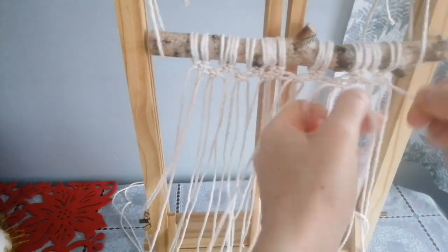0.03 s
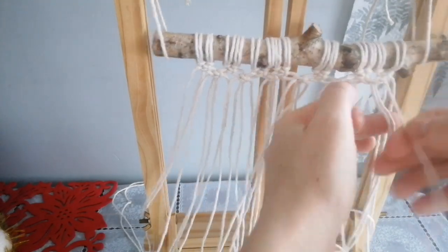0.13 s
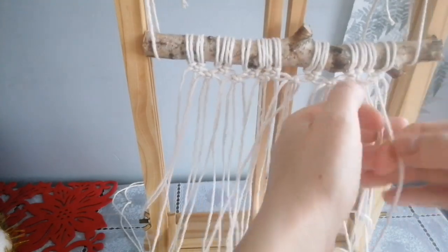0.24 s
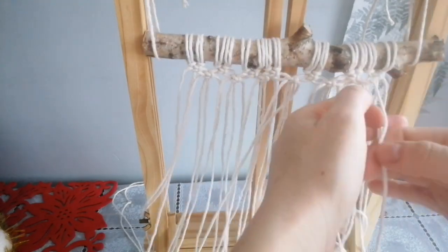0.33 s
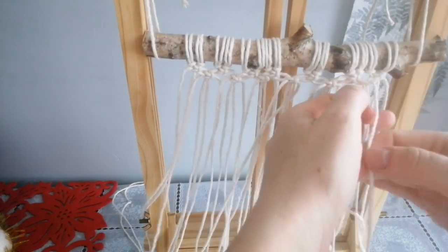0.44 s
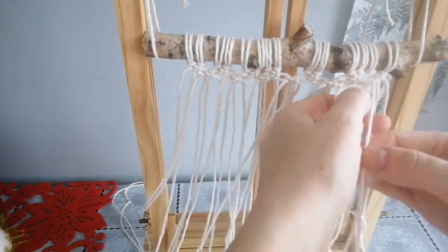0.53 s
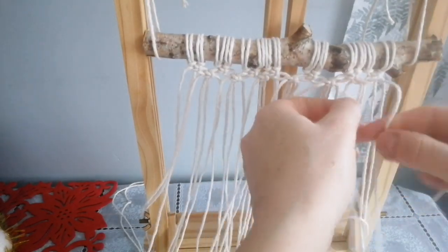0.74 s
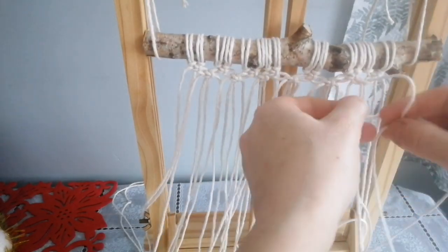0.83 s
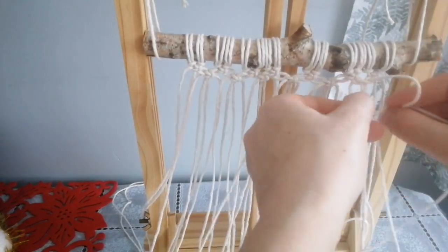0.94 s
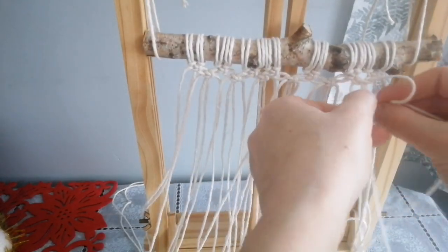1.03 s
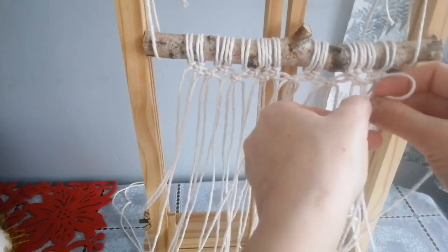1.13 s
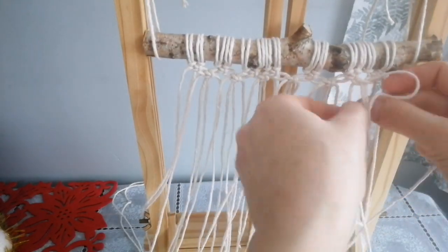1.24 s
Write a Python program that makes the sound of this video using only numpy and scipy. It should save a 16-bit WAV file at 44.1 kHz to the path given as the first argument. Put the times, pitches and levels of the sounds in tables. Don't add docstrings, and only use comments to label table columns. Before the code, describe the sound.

Cotton cords pulled through knots by hand, with clicky snaps and dull wooden frame thumps

```python
import sys
import numpy as np
from scipy import signal
from scipy.fft import rfft, irfft
from scipy.io import wavfile
from scipy.ndimage import uniform_filter1d

SR = 44100
rng = np.random.default_rng(int(sys.argv[2]) if len(sys.argv) > 2 else 0)


def boost_factor(decibels):
    exponent = np.asarray(decibels, float) / 20
    return 10 ** exponent


def master_out(mix):
    frames = np.transpose(np.atleast_2d(mix))
    ceiling = np.clip(frames, -1, 1)
    pcm = np.round(ceiling * 32767).astype(np.int16)
    wavfile.write(sys.argv[1], SR, pcm)


N = 57330

# start_s, length_s, level_db, brightness_db, peak_place (0-1 of the length)
STROKES = [(-.03, .12, -47, -9, 0), (0.045, 0.095, -73, 11.5, 0.45), (0.108, 0.58, -71.5, 2.5, 0.22),
           (0.2544, 0.039, -41.5, -6, 0), (0.4553, 0.025, -56.5, -5, 0.13), (0.53, 0.033, -57, 5, 0.2),
           (0.6136, 0.098, -52, 0.5, 0.03), (0.582, 0.046, -61.5, 2.5, 0.51),
           (.652, 0.037, -44, -1.5, 0.15), (0.657, 0.084, -46, 0.5, 0.06), (0.729, 0.094, -65, -1.5, 0.55),
           (0.856, 0.037, -62, -11, 0.26), (1.02, 0.11, -64.5, 3.5, 0.78), (1.118, 0.039, -55, 3, 0.18),
           (1.129, 0.082, -57, 3, 0.5), (1.288, 0.024, -62.5, -14, 0.36)]
# pitch_hz, level_db
CORD_TONE = [(650, -8.5), (850, 0.5), (1040, 4), (1350, -1.5), (1750, 4.5), (2900, -6.5), (3700, -18.5),
             (6000, -19.5)]
# pitch_hz, level_db
FIBRE_TONE = [(2500, 2.5), (4000, 0), (6500, 1.5), (8500, -4), (11000, -14.5)]
# pitch_hz, level_db
FUZZ_TONE = [(6000, -29), (9000, -10.5), (11000, -3.5), (13500, -11.5), (15800, -16)]
SLIPS_PER_S, SLIP_SPREAD_DB, CLUMP_DB = 7000, 2.6, 1.6
FUZZ_SLOPE = 1.82

# time_s, level_db
SQUEAK = [(.03, -106), (.07, -66), (.15, -71.5), (.24, -73), (.3, -79), (.48, -75.5), (.55, -100)]
SQUEAK_HZ, SQUEAK_WIDTH_HZ = 2585, 290

# start_s, level_db, pitch_hz, fade_s (to -60 dB), left_over_right_db
SNAPS = [(0.167, -63, 6100, 0.0021, 21), (.226, -59.5, 7100, .002, 3), (.256, -38, 6520, 0.0016, 21.5),
         (0.2581, -42.5, 1217, 0.055, 10.5), (0.2593, -39.5, 1605, 0.034, 2),
         (0.2593, -47.5, 2150, 0.099, 14), (.4555, -49.5, 1023, 0.024, 7), (.529, -43.5, 11600, 0.004, -19),
         (0.5292, -38, 1815, 0.0069, -8.5), (0.5315, -41, 5500, 0.00077, -11),
         (0.5282, -38, 4250, 0.005, -6.5), (0.5301, -44.5, 1063, 0.013, 7.5),
         (0.5303, -35, 2790, 0.0055, -5.5), (0.5362, -35, 1630, 0.0067, -9),
         (0.543, -41.5, 1840, 0.0091, -2), (0.5508, -46, 4280, 0.0028, 11),
         (0.6035, -51, 7000, 0.00045, -4), (0.613, -48, 9000, 0.00043, -1), (0.614, -44, 2700, 0.002, -8),
         (0.6148, -45, 5700, .002, -12), (0.6149, -48, 1010, 0.03, -8.5), (0.6308, -42.5, 2880, 0.0037, 0),
         (0.6558, -44.5, 1626, 0.02, -24.5), (.662, -32, 1006, 0.004, 10),
         (0.6708, -34.5, 2770, 0.0014, 9.5), (0.676, -66, 1960, .002, 2), (0.671, -37, 10400, 0.0024, -9.5),
         (0.691, -49, 2780, 0.0063, -12), (0.693, -40.5, 2950, 0.012, -1), (.709, -47, 2860, .004, 0),
         (0.717, -48, 3120, 0.0077, -9), (.7625, -51, 1867, 0.082, -2), (1.03, -58, 4840, 0.0027, -5),
         (1.0857, -56.5, 2780, 0.024, -16), (1.085, -54, 6500, 0.0031, -12), (1.124, -47, 2200, 0.0038, -4),
         (1.127, -56, 1036, 0.033, 16), (1.135, -49, 1930, 0.0054, -9.5), (1.1706, -50, 2700, .003, 3),
         (1.177, -49, 2450, .002, -2),
         (.6037, -51, 11000, .001, -6), (.6145, -47, 11500, .001, -10), (.6325, -48, 11000, .002, -8),
         (.648, -47, 11500, .001, -8), (.664, -47, 12900, .001, -8), (0.6711, -39.5, 6500, 0.0023, -5),
         (0.679, -56, 7950, .001, 0), (0.71, -52, 10500, .001, -6), (0.719, -52, 11500, .001, -7),
         (0.775, -56, 1870, 0.049, -1), (1.095, -50, 2370, 0.0047, -3), (1.192, -55, 3000, 0.0036, 3)]
BURST_S, SHORTEST_S = 0.0017, 0.0005
SPREAD, SKIRT = 0.2, 0.6
LAG_S, HANDS_CROSS_S = 0.00036, 0.5

# start_s, level_db, pitch_hz, fade_s (to -60 dB), push_s
KNOCKS = [(.0, -48.5, 391, 0.3, 0.00033), (0.2568, -13.5, 309, 0.034, 0.003),
          (0.2629, -27.5, 100, 0.073, 0.0043), (0.174, -42, 131.8, 1, 0.021),
          (.278, -38.5, 392, 0.12, 0.0051), (0.2969, -34, 334, 0.11, 0.0026),
          (.312, -31.5, 200, 0.041, 0.0032), (.342, -40, 389, 0.081, 0.0063),
          (0.37, -37.5, 333, 0.056, 0.0064), (0.347, -33.5, 67.2, 0.19, 0.0028),
          (.423, -39.5, 49.4, .15, .006), (0.452, -35.5, 91, 0.083, 0.007), (.51, -47.5, 59, 0.065, 0.01),
          (0.5293, -42, 71, 0.069, .006), (0.6574, -15, 124.4, 0.089, 0.021),
          (0.659, -31.5, 134, 0.57, 0.011), (0.668, -31, 101.6, 0.22, 0.011),
          (.662, -31.5, 354, 0.058, 0.0063), (.664, -39, 475, 0.063, 0.0043),
          (0.719, -47.5, 298.6, 0.23, 0.0072), (1.29, -49, 296, 0.16, 0.006)]
# time_s, level_db, upper_share_db
SHUDDER = [(0, -44.5, 5), (.13, -63, 1), (.17, -40.5, -9), (.23, -34.5, -17), (.26, -32, 0),
           (.296, -34, -1.5), (.372, -39.5, -8), (.408, -51, -13), (.46, -47.5, -2.5), (.6, -57.5, 0.5),
           (.64, -43, -4.5), (.67, -39, 8.5), (.75, -40, -3.5), (.878, -57, -6.5), (1.3, -61, 6)]
# pitch_hz, width_hz, level_db
FRAME_LOW = [(47.6, 30.5, -12), (98.4, 22, -6.5), (129.2, 12.3, -6)]
# pitch_hz, width_hz, level_db
FRAME_HIGH = [(188.6, 75, -4.5), (269, 97, -6.5), (326, 67, -10), (403, 26.5, -9.5)]
HELD_S, HELD_DB_PER_S = 0.814, 502
UPPER_HZ, UPPER_LAG_S = 200, 0.00043
SWAY_DB = -16

# pitch_hz, fade_s (to -60 dB)
ROOM = [(250, 0.31), (2000, 0.32), (6000, 0.22), (14000, 0.18)]
ROOM_DB, SNAP_ROOM_DB = -8.5, -1.5

# pitch_hz, level_db (per Hz)
AIR = [(15, -32), (25, -5), (66, -11.5), (246, -19.5), (482, -23.5), (598, -32), (1850, -28.5), (2490, -32),
       (15500, -39)]
AIR_DB, PATCHY_DB = -62.5, 1.5
# pitch_hz, likeness (0-1)
SAME = [(60, 1), (250, 0.79), (500, 0.06), (900, 0.011), (15000, 0.012)]
# pitch_hz, level_db
HUM = [(48.4, -65), (102.3, -68.5), (156.1, -70.5), (306.8, -75)]

# pitch_hz, level_db
LEFT_PORT = [(250, 0.5), (600, 1.5), (1200, 1.5), (3000, 3), (5000, 0.5), (7000, -1), (10000, -8.5),
             (15000, -9)]
# pitch_hz, level_db
RIGHT_PORT = [(250, -10), (600, 2.5), (3000, 2.5), (8500, -3), (11000, -0.5), (15000, -5.5)]
EVEN_BELOW_HZ, EDGE_HZ = 250, 15900


def evened(x):
    return x / np.sqrt(np.mean(x ** 2) + 1e-20)


def read(points, hz):
    f, value = np.transpose(points)
    return np.interp(np.log(hz + 1), np.log(f + 1), value)


def along(points, column=1):
    columns = np.transpose(points)
    return np.interp(np.arange(N) / SR, columns[0], columns[column])


def resonate(x, hz, width):
    turn = np.exp(2j * np.pi * hz * np.arange(x.shape[-1]) / SR)
    r = np.exp(-np.pi * width / SR)
    return 2 * (turn * signal.lfilter([1 - r], [1, -r], x / turn)).real


def body(x, peaks):
    out = sum(boost_factor(db) * resonate(resonate(x, hz, w), hz, w) for hz, w, db in peaks)
    return out / np.sqrt(sum(boost_factor(2 * db) * np.pi * w / SR for hz, w, db in peaks))


def coloured(x, points):
    hz = np.fft.rfftfreq(N, 1 / SR)
    below, above = (points[0][0] / 2, -80), (points[-1][0] * 2, -80)
    gain = boost_factor(read([below] + points + [above], hz))
    return irfft(rfft(x) * evened(gain), N)


def add(mix, s, sound):
    part = mix[..., round(s * SR):][..., :sound.shape[-1]]
    part += sound[..., :part.shape[-1]]


def rubbing():
    t, power = np.arange(N) / SR, np.zeros((3, N))
    for start, length, level_db, bright_db, peak in STROKES:
        u = (t - start) / length
        shape = np.clip(np.minimum(u / peak, (1 - u) / (1 - peak)), 0, 1)
        layer_db = level_db + np.array([[0], [bright_db - 3.0], [FUZZ_SLOPE * bright_db - 11.5]])
        power += (boost_factor(layer_db) * shape) ** 2

    chance, sign, size = rng.random((N, 3, 3)).T
    clicks = np.sign(sign - 0.5) * boost_factor(-SLIP_SPREAD_DB * np.log(size + 0.0008))
    slips = evened((chance < SLIPS_PER_S / SR) * clicks)
    clumps = boost_factor(CLUMP_DB * evened(uniform_filter1d(rng.standard_normal(N), size=130)))

    lag = round(LAG_S * SR)
    left = np.where(t > HANDS_CROSS_S, np.roll(slips[0], lag), np.roll(slips[0], -lag))
    drive = clumps * (0.3 * np.array([left, slips[0]]) + 0.92 * slips[1:])
    tones = (CORD_TONE, FIBRE_TONE, FUZZ_TONE)
    return sum(coloured(drive * np.sqrt(p), tone) for p, tone in zip(power, tones))


def squeak():
    waver = evened(uniform_filter1d(rng.standard_normal(N), size=400))
    noise = rng.standard_normal(N) * boost_factor(along(SQUEAK) + 1.8 * waver)
    whistle = body(noise, [(SQUEAK_HZ, SQUEAK_WIDTH_HZ, 0)])
    return whistle * boost_factor(np.array([[3.0], [-6.0]]))


def snaps():
    out, t = np.zeros((2, N)), np.arange(8000) / SR
    events = SNAPS
    bursts = rng.standard_normal((len(events), 8000)) * np.exp(-t / BURST_S)
    for burst, (s, level_db, hz, fade_s, pan_db) in zip(bursts, events):
        width = np.log(1000) / np.pi / max(fade_s, SHORTEST_S)
        width += SPREAD * hz * (hz > 4000)
        ring = resonate(burst, hz, width)
        ring = resonate(resonate(ring, hz, SKIRT * hz), hz, SKIRT * hz)
        ring = ring / abs(ring).max()
        add(out[0], s + LAG_S * (s > HANDS_CROSS_S), boost_factor(level_db + pan_db / 2) * ring)
        add(out[1], s, boost_factor(level_db - pan_db / 2) * ring)
    return out


def frame():
    knocks, t = np.zeros((2, N)), np.arange(SR // 2) / SR
    for s, level_db, hz, fade_s, push_s in KNOCKS:
        onset = (1 - np.exp(-2 * t / max(push_s, SHORTEST_S))) ** 2
        fading = boost_factor(level_db - 60 * t / fade_s)
        add(knocks[int(hz > UPPER_HZ)], s, -fading * onset * np.sin(2 * np.pi * hz * t))

    jolts = rng.standard_normal((N, 2)).T * boost_factor(along(SHUDDER) - 6.5)
    held = boost_factor(-HELD_DB_PER_S * np.maximum(np.arange(N) / SR - HELD_S, 0))
    low = knocks[0] * held + body(jolts[0], FRAME_LOW)
    upper = knocks[1] + body(jolts[1] * boost_factor(along(SHUDDER, column=2)), FRAME_HIGH)
    sway = boost_factor(SWAY_DB) * body(jolts[1], FRAME_LOW)
    return low + np.array([np.roll(upper, round(UPPER_LAG_S * SR)) + sway, upper - sway])


def room(x):
    echoes = np.zeros((2, SR // 2))
    spots = np.arange(100, SR // 2 - 20, 20)
    at = spots + rng.integers(0, 20, (2, len(spots)))
    np.put_along_axis(echoes, at, rng.choice([-1., 1.], at.shape), 1)
    hz, t, z = signal.stft(echoes, SR, nperseg=256)
    fading = boost_factor(-60 * t / read(ROOM, hz)[:, None])
    tail = signal.istft(z * fading, SR, nperseg=256)[1]
    return signal.fftconvolve(x, tail / np.linalg.norm(tail[0]), axes=1)[:, :N]


def air():
    frames, hz = N // 256 + 5, np.fft.rfftfreq(1024, 1 / SR)
    a, b, c, d, patches = rng.standard_normal((frames, 513, 5)).T
    patches = uniform_filter1d(patches, size=12, axis=0)
    patches = evened(uniform_filter1d(patches, size=10, axis=1))
    same = np.clip(read(SAME, hz), -1, 1)[:, None]
    left = a + 1j * b
    right = same * left + np.sqrt(1 - same ** 2) * (c + 1j * d)
    z = np.array([left, right]) * boost_factor(read(AIR, hz)[:, None] + PATCHY_DB * patches)
    hiss = evened(signal.istft(z, nperseg=1024, noverlap=768)[1][:, :N])

    t = np.arange(N) / SR
    hum = sum(boost_factor(db) * np.sqrt(2) * np.sin(2 * np.pi * (f * t + rng.random())) for f, db in HUM)
    return boost_factor(AIR_DB - 3.0) * hiss + hum


def scene():
    rub, snap = rubbing() + squeak(), snaps()
    echoes = boost_factor(ROOM_DB) * room(rub + boost_factor(SNAP_ROOM_DB) * snap)
    return rub + snap + echoes + frame() + air()


def top_cut(x):
    return signal.sosfilt(signal.butter(12, 16150, fs=SR, output="sos"), x)


def record(dry):
    hz = np.fft.rfftfreq(N, 1 / SR)
    port_db = np.array([read(LEFT_PORT, hz), read(RIGHT_PORT, hz)])
    port_db = port_db * np.clip(hz / EVEN_BELOW_HZ - 1, 0, 1)
    edge = np.clip((EDGE_HZ - hz) / 250 + 0.01, 0.01, 1)
    mix = irfft(rfft(dry) * boost_factor(port_db) * edge, N)
    return top_cut(mix)


dry = scene()
out = record(dry)
master_out(out)
```